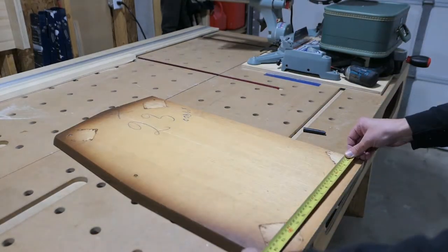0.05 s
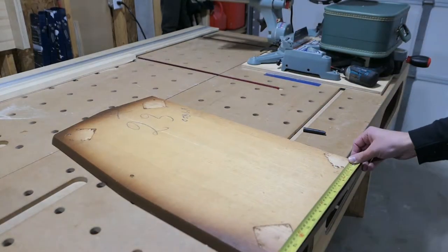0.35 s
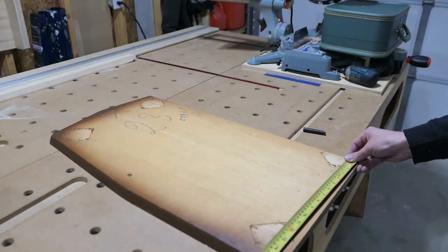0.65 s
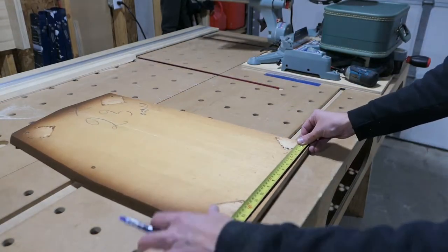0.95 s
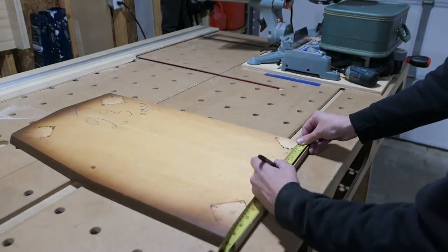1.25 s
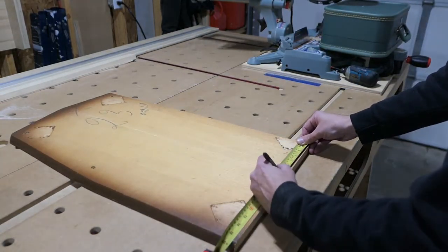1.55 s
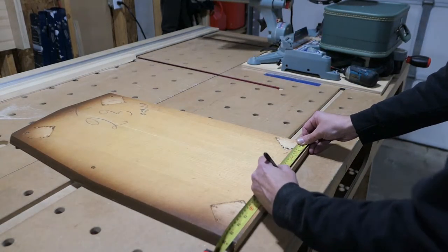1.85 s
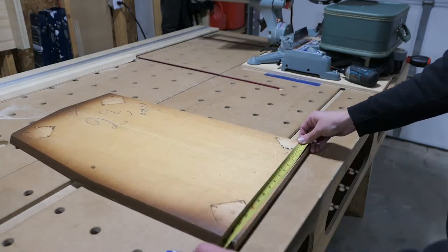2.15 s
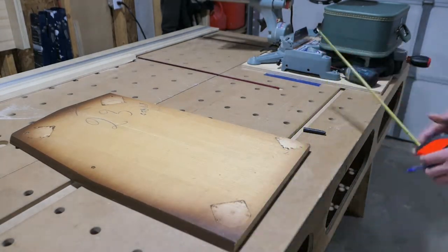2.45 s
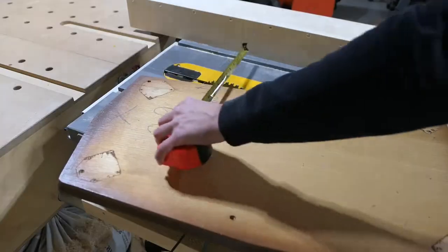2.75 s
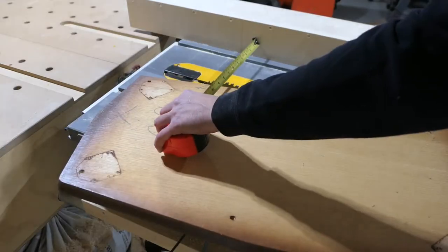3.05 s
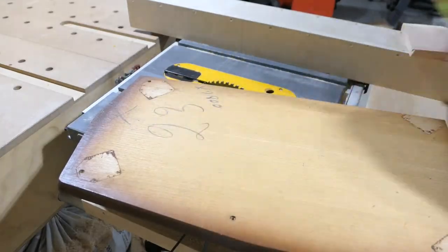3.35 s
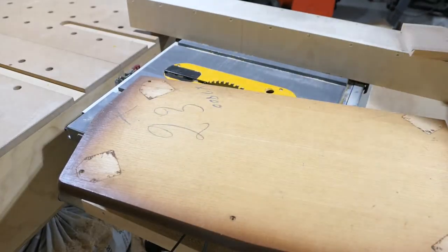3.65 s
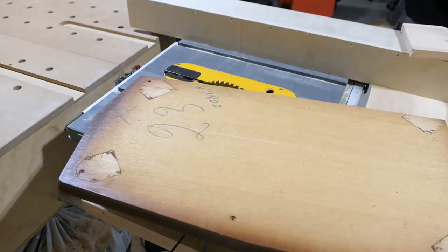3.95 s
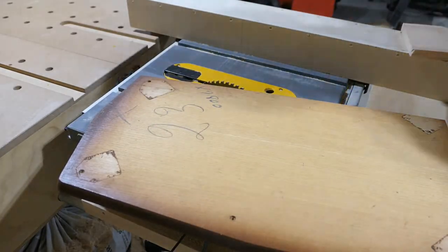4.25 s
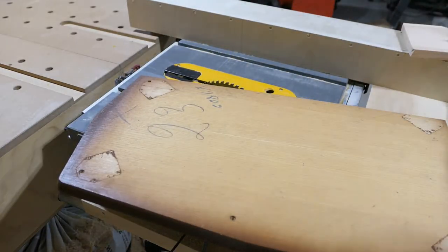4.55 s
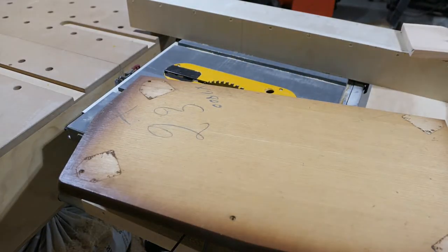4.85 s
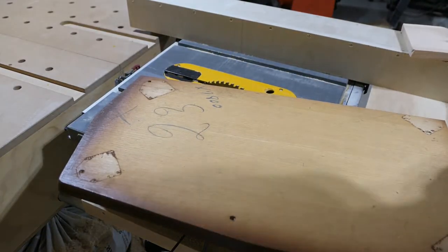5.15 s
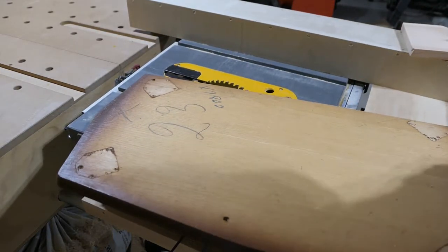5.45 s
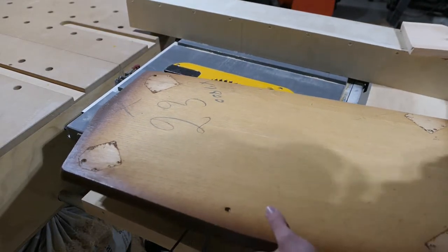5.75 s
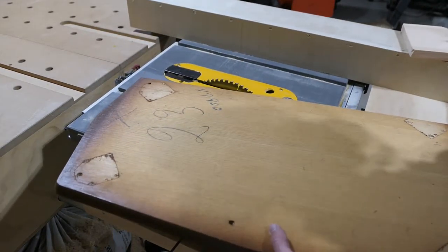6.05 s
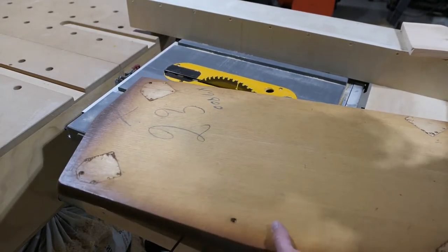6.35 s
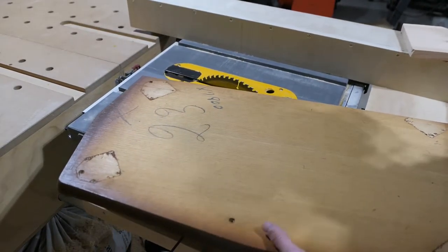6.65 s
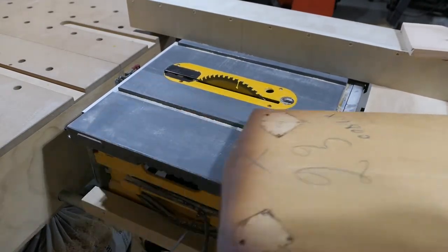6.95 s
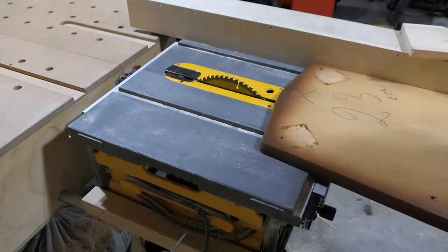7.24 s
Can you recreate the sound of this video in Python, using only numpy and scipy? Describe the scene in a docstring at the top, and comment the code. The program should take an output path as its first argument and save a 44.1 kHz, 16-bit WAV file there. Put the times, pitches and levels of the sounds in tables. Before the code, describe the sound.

A wooden board knocks on a workbench, a steel tape measure rattles shut, then the board scrapes and clatters over a metal saw table.

```python
"""Woody knocks and a short scrape, then the clicks and rattle of a steel tape running back into its case.
A wooden tabletop is handled on a workbench, then laid on a table saw, where it knocks, scrapes over the
metal in small slips and clatters against the edge. Each blow rings the board's modes; each scrape is a
stream of tiny catches with crackling dust. The workshop is small and dry, with a faint hush behind it."""
import sys
import numpy as np
from scipy import signal
from scipy.fft import rfft, irfft
from scipy.io import wavfile
from scipy.ndimage import uniform_filter1d

SR = 44100
rng = np.random.default_rng(int(sys.argv[2]) if len(sys.argv) > 2 else 0)


def to_wav(sig):
    """Store sig (one row per channel, or 1-D mono) as 16-bit WAV at the path in sys.argv[1].

    Samples outside -1..1 are clipped; the rate is SR.
    """
    pcm = np.clip(np.atleast_2d(sig), -1, 1) * 32767
    pcm = np.round(pcm).astype(np.int16)
    wavfile.write(sys.argv[1], SR, pcm.T)  # frames by channels


N = 326064
HZ = np.fft.rfftfreq(4096, 1 / SR)  # frequency grid of every EQ curve
T = np.arange(int(.4 * SR)) / SR  # time axis of one hit, in seconds

# Hits of board and hands on the bench, then of the board on the saw. Each row: start in seconds,
# contact time in seconds, favoured pitch in Hz, strength in dB, treble tilt in dB per octave.
BENCH_KNOCKS = [(.001, 0.00052, 980, -13.5, -7.5), (.144, 0.00089, 1490, -6, -4),
                (.219, 0.021, 810, -17.5, -2), (.457, 0.015, 790, -29, -1),
                (1.037, 0.00035, 1400, 7.5, -4.5), (1.07, 0.0051, 1210, 4.5, -5.5),
                (1.088, 0.0097, 1230, -2.5, -4.5), (1.355, 0.0033, 930, -26.5, -4.5),
                (1.757, .0025, 1120, -35, -12), (1.822, 0.0032, 1090, -32.5, -8),
                (1.888, 0.001, 1070, -33.5, -8), (1.936, 0.0019, 333, -24.5, -18),
                (2.141, 0.011, 650, -14.5, -5.5)]
SAW_KNOCKS = [(3.951, .013, 1180, 7.5, -7), (3.986, 0.018, 2750, 7, -7), (4.015, 0.004, 1600, 5.5, -4),
              (4.24, 0.0036, 1140, -20, -4), (4.822, 0.00043, 930, -16, -9.5),
              (4.924, 0.0045, 1010, -18.5, -10.5), (5.002, 0.0024, 2180, -3.5, -4.5),
              (5.131, 0.0021, 755, -19, -7.5), (5.264, 0.0025, 820, -13.5, -4),
              (5.301, 0.0009, 624, -7, -9), (5.376, 0.0022, 890, -13, -4), (5.421, 0.00032, 950, -14, -4),
              (5.787, 0.0052, 590, 0.5, -5.5), (5.808, 0.0023, 970, 0, -18), (5.84, 0.0034, 370, -14, -16),
              (5.878, 0.0014, 790, -8, -4), (6.108, 0.0027, 394, -10.5, -7), (6.206, 0.012, 950, -8, -4.5),
              (6.272, 0.0072, 573, -1, -7.5), (6.379, 0.00082, 900, -5, -5.5),
              (6.402, 0.0077, 390, -1.5, -6.5), (6.603, 0.0024, 900, -8, -6), (6.667, 0.01, 417, -4, -10),
              (6.942, 0.00044, 2460, -2.5, -4), (7.126, 0.00015, 1080, 5.5, -1.5),
              (7.147, 0.006, 525, 4, 0), (7.171, 0.0011, 820, 6.5, -13), (7.207, .0016, 935, 6.5, -5.5),
              (7.237, .0005, 634, 0.5, -7), (7.274, 0.00073, 720, -1.5, -6.5)]
# Sharp clicks of tape, case and pen, and ticks of the board catching on the saw. Each row: as above.
CLICKS = [(1.755, .0005, 14000, -44, -1.5), (1.822, .0005, 14000, -45, 0), (1.888, 0.00042, 14000, -46, -1),
          (1.989, 0.0022, 14000, -43, -1.5), (2.083, .00015, 13975, -34, -3.5),
          (2.137, 0.005, 1360, -8.5, -1.5), (2.49, 0.0098, 10200, -20.5, 0.76),
          (2.513, 0.0084, 1220, -16.5, -2.2), (2.722, 0.00086, 13000, -18.5, -0.2),
          (2.835, 0.0035, 1500, 5, -9), (2.876, 0.0045, 2090, 1, -3), (3.217, 0.00025, 7200, -6.5, -0.24),
          (3.345, 0.0036, 4350, -31, 0.8), (3.421, 0.0039, 900, -29, 1.5), (3.66, 0.0067, 1980, -1, -1),
          (4.949, 0.015, 5370, -7, -3), (4.99, 0.0062, 690, -7.5, -3.5), (5.046, 0.0019, 510, -4.5, -5.5),
          (5.566, 0.0023, 850, -10, -4), (5.609, 0.0021, 573, -9, -5.5), (6.012, .002, 880, -17, -2.5),
          (6.314, .001, 2930, -10.5, -4), (6.538, 0.0093, 2170, -1, -6), (6.552, 0.0013, 2300, -11.5, -4.5),
          (6.751, 0.0045, 2620, -20.5, 0)]
# Rubs of tape blade and hands. Each row: start, swell and fade in seconds, favoured pitch in Hz,
# strength in dB, treble tilt in dB per octave.
RUBS = [(.004, 0.0067, .03, 1100, -18.5, -3.5), (.055, 0.0053, 0.026, 2050, -14, -4.5),
        (.101, 0.0085, .018, 1740, -4, -3.5), (0.321, .0034, 0.036, 2370, -24.5, -2.5),
        (1.225, .01, 0.074, 14000, -29.5, -3), (2.184, 0.018, 0.0046, 13000, -23, 1),
        (2.441, .038, .01, 12000, -36.5, 1.4), (2.529, 0.0081, 0.081, 8000, -35, 3),
        (2.705, 0.01, 0.0025, 13000, -24.5, 1.3), (2.755, .006, 0.15, 1000, -23, 0.5),
        (2.848, 0.0067, 0.01, 9400, -22.5, 1.2), (3.234, 0.017, 0.031, 10400, -20.5, 0.3),
        (3.519, 0.02, 0.018, 4420, -9, -0.46), (3.579, 0.017, 0.092, 10000, -18, 1.1),
        (3.722, 0.018, 0.0064, 5040, -15, 1.5), (4.275, 0.0073, 0.024, 1100, -26, -1),
        (4.401, 0.0067, 0.041, 6300, -11, -1.5)]
# A corner catching. Each row: start in seconds, pitch in Hz, level in dB, T60 in seconds.
SQUEAKS = [(4.014, 2870, -38, 0.15), (6.3118, 2930, -23.5, 0.0086), (7.2057, 2220, -15, 0.017)]
# Low thuds under a few knocks. Each row: start in seconds, level in dB.
THUMPS = [(1.037, -30.5), (4.017, -31), (5.845, -29.5), (7.127, -33)]
# The board's ring on each surface. Each row: pitch in Hz, relative level in dB, T60 in seconds.
BENCH_MODES = [(358, -7.5, 0.68), (685, -5, 0.13), (793, 9, 0.14), (994, 4.5, 0.12), (1160, 4, 0.067),
               (1250, -16, 0.14), (1550, 6.5, 0.062), (1780, -22, .18), (2740, -3, 0.093)]
SAW_MODES = [(368, -10.5, 0.2), (530, -7, 0.13), (686.3, -6.5, 0.18), (825.6, 2, 0.11), (908, -3.5, 0.15),
             (1160, -6, 0.073), (1495, -2, 0.057), (1993, 7, 0.043), (3070, -11, .1), (3790, -9, 0.12),
             (5603, -6, 0.047)]
# Fader moves for the board turning on the bench and dragging over the saw.
# Each row: time in seconds, friction in dB, grit in dB.
BENCH_SLIDE = [(0.64, -83, -89), (0.706, -50.5, -56.5), (0.8, -41.5, -44), (0.832, -43, -48.5),
               (0.88, -71, -65), (0.94, -91, -108)]
SAW_SLIDE = [(5.738, -74, -74), (5.786, -33, -40), (5.81, -28.5, -51), (5.828, -46.5, -59.5),
             (5.94, -49.5, -59), (5.966, -45, -51.5), (6.15, -47.5, -66), (6.288, -40, -53),
             (6.512, -40.5, -58.5), (6.558, -37.5, -53), (6.65, -50, -69), (6.684, -52, -47),
             (6.716, -51, -69), (6.808, -50.5, -49.5), (6.86, -32.5, -34), (6.952, -46, -44.5),
             (7.014, -60, -78), (7.11, -52, -56)]
# Short skids on the saw. Each row: start in seconds, hold in seconds, friction in dB, grit in dB.
SHOVES = [(5.247, 0.046, -53.5, -65), (5.365, 0.12, -57.5, -61.5), (5.531, 0.01, -47.5, -49),
          (5.569, 0.087, -53.5, -63), (6.205, 0.022, -46, -56), (6.382, .04, -46, -55),
          (7.128, 0.12, -41.5, -46.5)]
# Centres of the five-band EQ that voices hits and rubs, in Hz.
BAND_HZ = (450, 1100, 2700, 6200, 12000)
# Tone of each family of sounds. Each row: frequency in Hz, relative level in dB.
BENCH_TONE = [(450, -3.5), (1100, 0.5), (2700, -1.5), (6200, -1), (12000, -2)]
SAW_TONE = [(450, -0.5), (1100, 0.5), (2700, -0.4), (6200, -0.5), (12000, -5.7)]
CLICK_TONE = [(450, -12.5), (1100, -0.5), (2700, -5.5), (6200, 0), (12000, -0.5)]
RUB_TONE = [(450, -5.5), (1100, 2.5), (2700, 0.7), (6200, 1), (12000, -1.7)]
BENCH_SCRAPE_TONE = [(120, -68), (200, -50), (315, 4.5), (399, -16), (488, -7), (742, 8), (812, 3),
                     (1170, -1), (3420, -15.5), (8050, -21.5), (15500, -34.5)]
SAW_SCRAPE_TONE = [(120, -65), (200, -33), (321, -11.5), (378, -7), (479, -1.5), (742, -4), (827, 2),
                   (1050, -3.5), (1230, -4), (1560, -6), (2600, -9), (2900, -12.5), (6470, -19),
                   (15500, -34)]
AIR_TONE = [(15, -87), (25, -27), (141, -14), (451, -1), (1230, -4), (1370, -2), (2160, -6), (3080, -12),
            (3340, -9.5), (7920, -19), (14000, -15.5), (16000, -27)]
# Knocks, clicks and rubs have little bass. Each row: frequency in Hz, gain in dB.
BASS_ROLLOFF = [(20, -27.5), (100, -34), (150, -23), (210, -15.5), (270, -7.5), (350, 1.5), (480, 1.5),
                (16000, 0)]
# The workshop's decay. Each row: frequency in Hz, T60 in seconds.
ROOM_T60 = [(100, 0.68), (350, 0.36), (1000, 0.16), (3000, 0.22), (7000, 0.21), (15000, 0.16)]
# Stereo width of the echoes and of the hush. Each row: frequency in Hz, side against mid in dB.
ECHO_WIDTH = [(100, -2), (400, -14.5), (2200, -4), (10000, -5.5)]
AIR_WIDTH = [(60, -10), (240, 8.5), (950, 9.5), (3770, 4), (15000, -4.5)]
# Stereo balance. Each row: frequency in Hz, left against right in dB.
PAN = [(250, 2.5), (550, -0.4), (1100, -0.7), (2100, -2.5), (4200, -1.1), (12000, -0.5)]


def knocks(rows, tone, modes, ring_db, body_db, body_t60, body_hz, lift_db, gain_db):
    """A blow sets off the board's dense, damped body and its clear modes."""
    out = np.zeros(N)
    for start, contact, hz, db, tilt_db in rows:
        dense = rng.standard_normal(len(T)) * amp(-60 * T / body_t60)
        dense = unit(signal.sosfilt(signal.butter(2, body_hz, fs=SR, output="sos"), dense))
        clear = amp(ring_db + 0.12 * min(db, 0)) * ring(modes)  # light touches ring less
        attack = 1 - np.exp(-2 * T / max(contact, 1 / SR))
        knock = contact_force(contact, crack=0.81) + (amp(body_db) * dense + clear) * attack
        add(out, start, voice(favour(knock, hz, lift_db), hz, db, tilt_db, tone))
    return amp(gain_db) * out


def ring(modes):
    """The board's clear modes; each blow excites them a little differently."""
    partials = np.zeros(len(T))
    for hz, db, t60 in modes:
        decay = amp(db + rng.normal(0, 1.3) - 60 * T / t60)
        partials += decay * np.sin(2 * np.pi * (hz * T + rng.random()))
    return unit(partials)


def contact_force(contact, crack, soft_s=0.0022):
    """A brief contact is one crack; a longer one starts softly and chatters."""
    attack = 1 - np.exp(-2 * (T + 1 / SR) / contact)
    force = unit(grains(len(T), per_s=22000, spread_db=1.5) * attack * np.exp(-T / contact))
    force[0] += crack * np.exp(-contact / soft_s)
    return force


def favour(x, hz, lift_db, octaves=0.12):
    """A narrow peak: where a blow lands decides which resonances speak most."""
    return colour(x, lift_db / (1 + (np.log2((HZ + 1) / hz) / octaves) ** 2))


def voice(x, favoured_hz, level_db, tilt_db, tone, pivot_hz=1100, hump_db=9, hump_octaves=0.87):
    """EQs a contact to its family's tone, tilted by hardness, with a broad hump at its favoured pitch."""
    centres = np.array(BAND_HZ)
    power, hz = abs(rfft(x)) ** 2, np.fft.rfftfreq(len(x), 1 / SR)
    own_db = [10 * np.log10(power[abs(np.log((hz + 1) / f)) < np.log(1.5)].mean()) for f in centres]
    strength_db = level_db * np.where(centres < pivot_hz, 0.66, 1)  # harder blows sound brighter
    hardness_db = tilt_db * np.maximum(np.log2(centres / pivot_hz), 0)
    place_db = hump_db * np.exp(-(np.log2(centres / favoured_hz) / hump_octaves) ** 2)
    gains_db = curve(tone, centres) + strength_db + hardness_db + place_db - own_db
    return colour(x, curve(np.c_[centres, gains_db]) + curve(BASS_ROLLOFF))


def scrape(levels, tone, modes, slips_per_s, spread_db, ring_db, catch_db, crackle_db,
           friction_db, judder_db, grit_db):
    """Three spots under the board catch and slip, each with its own woody colour; dust crackles."""
    friction, grit = levels
    judder = friction + np.minimum(0.97 * (friction - grit), 9)  # dies as grit takes over
    drive = np.zeros(N)
    for _ in range(3):
        slips = grains(N, slips_per_s, spread_db) * wobble(per_s=45, depth_db=catch_db)
        spot = unit(rng.standard_normal(len(T)) * np.exp(-T / 0.0027))
        drive += signal.oaconvolve(slips, spot + amp(ring_db) * ring(modes))[:N]
    wood = colour(drive, curve(tone))
    specks = grains(N, per_s=920, spread_db=0.97)
    dust = colour(unit(drive) + amp(crackle_db) * specks, curve(tone))
    return (amp(friction + friction_db) * band(wood, 502, 4100)
            + amp(judder + judder_db) * band(wood * wobble(per_s=24, depth_db=1.1), 348, 594)
            + amp(grit + grit_db) * band(dust, 2780, 19600))


def slide(rows):
    """Friction and grit envelopes of a long slide in dB, silent outside its span."""
    times, *levels = np.transpose(rows)
    return np.array([np.interp(np.arange(N) / SR, times, db, left=-120, right=-120) for db in levels])


def shove(start, hold, friction_db, grit_db, rise_db_per_s=1202, fall_db_per_s=212):
    """Friction and grit envelopes of a shove in dB: it breaks loose quickly, holds and runs out."""
    t = np.arange(N) / SR - start
    shape_db = rise_db_per_s * np.minimum(t, 0) - fall_db_per_s * np.maximum(t - hold, 0)
    return np.array([friction_db + shape_db, grit_db + shape_db])


def clicks(gain_db=-2, tail_db=-7, tail_t60=0.011):
    """Sharp clicks of tape, case and pen, and ticks of the board catching on the saw; all die fast."""
    out = np.zeros(N)
    for start, contact, hz, db, tilt_db in CLICKS:
        tail = unit(rng.standard_normal(len(T)) * amp(-60 * T / tail_t60))
        click = contact_force(contact, crack=0.13) + amp(tail_db) * tail
        add(out, start, voice(favour(click, hz, lift_db=6.5), hz, db, tilt_db, CLICK_TONE))
    return amp(gain_db) * out


def rubs(gain_db=-2, rattle_db=-5):
    """Tape blade and hands rub: fine friction grains and loose ticks swell and stop."""
    out = np.zeros(N)
    for start, swell, fade, hz, db, tilt_db in RUBS:
        release = np.exp(-(np.maximum(T - swell, 0) / fade) ** np.sqrt(2) / 2)
        stroke = np.minimum(T / swell, 1) * release
        friction = grains(len(T), per_s=12000, spread_db=4.2)
        rattle = amp(rattle_db) * grains(len(T), per_s=110, spread_db=0.33)
        add(out, start, voice((friction + rattle) * stroke, hz, db, tilt_db, RUB_TONE))
    return amp(gain_db) * out


def squeaks(attack_s=0.0016):
    """A sticking corner gives a short, pure tone."""
    out = np.zeros(N)
    for start, hz, db, t60 in SQUEAKS:
        envelope = amp(db - 60 * T / t60) * np.minimum(T / attack_s, 1)
        add(out, start, envelope * np.sin(2 * np.pi * hz * T))
    return out


def thumps(hz=220, t60=0.06):
    """A short, low thud under a few knocks: one quickly damped mode of the stand."""
    out = np.zeros(N)
    mode = unit(np.sin(2 * np.pi * hz * T) * amp(-60 * T / t60) * (1 - np.exp(-T * hz)))
    for start, db in THUMPS:
        add(out, start, amp(db) * mode)
    return out


def workshop(x, cycle_hz=0.6445):
    """Three echo patterns crossfade as board and hands move; the direct sound is the same in both ears."""
    turn = 2 * np.pi * cycle_hz * np.arange(N) / SR
    fades = [np.cos(turn + k * np.pi / 3) * np.sqrt(2 / 3) for k in range(3)]
    mid, side = sum(signal.oaconvolve((x * fade)[None], reflections(), axes=1)[:, :N] for fade in fades)
    return np.array([x + mid + side, x + mid - side])


def reflections(tail_db=-4.5, early_db=-9, build_s=0.0023):
    """Mid and side echoes of one spot: near surfaces first, then a short tail."""
    hz, t, noise = signal.stft(rng.standard_normal((2, len(T))), SR, nperseg=256)
    decay = amp(-60 * t / curve(ROOM_T60, hz)[:, None])
    tail = signal.istft(noise * decay, SR, nperseg=256)[1][:, :len(T)]
    tail = unit(tail * (1 - np.exp(-(T / build_s) ** 2)))
    early = unit(rng.standard_normal((2, len(T))) * (T > .001) * np.exp(-T / 0.0011))
    mid, side = amp(tail_db) * tail + amp(early_db) * early
    return np.array([mid, colour(side, curve(ECHO_WIDTH))])


def air(mid_db=-70):
    """A wide, steady bed of room and microphone hush."""
    mid, side = (unit(colour(rng.standard_normal(N), curve(AIR_TONE))) * np.sqrt(N) for _ in range(2))
    side = colour(side, curve(AIR_WIDTH))
    return amp(mid_db) * np.array([mid + side, mid - side])


def suppress(x, depth_db=4.5, margin_db=6, knee_db=7, forget_db_per_s=175):
    """A noise suppressor ducks each band once it falls well below its recent peak."""
    _, t, spectra = signal.stft(x, SR, nperseg=512)
    power = uniform_filter1d((abs(spectra) ** 2).mean(0), size=17, axis=0)
    power = uniform_filter1d(power, size=3, axis=1)
    now_db = 10 * np.log10(abs(power) + 1e-20)
    recent_db = np.maximum.accumulate(now_db + forget_db_per_s * t, axis=1) - forget_db_per_s * t
    cut_db = depth_db * np.clip((recent_db - now_db - margin_db) / knee_db, 0, 1)
    return signal.istft(spectra * amp(-cut_db), SR, nperseg=512)[1][:, :N]


def grains(samples, per_s, spread_db):
    """Tiny slips of random sign, a few of them large."""
    sizes = amp(spread_db * np.minimum(rng.exponential(1, samples), 3.5))
    return unit(rng.standard_normal(samples) * sizes * (rng.random(samples) < per_s / SR))


def wobble(per_s, depth_db):
    """A gain that wavers at random around 1."""
    points = rng.standard_normal(N // 100)
    drift = np.interp(np.arange(N) / SR * per_s, np.arange(len(points)), points)
    return amp(depth_db * np.clip(drift, -1.5, 1.5))


def colour(x, gain_db):
    """Minimum-phase EQ with its gains on the HZ grid."""
    log_gain = np.log(amp(np.maximum(gain_db, -100)))
    mirrored = np.concatenate([log_gain, log_gain[-2:0:-1]])
    taps = irfft(np.exp(np.conj(signal.hilbert(mirrored)))[:len(HZ)])
    return signal.oaconvolve(x, taps)[:len(x)]


def band(x, lo_hz, hi_hz):
    """One band of x, at rms 1."""
    sos = signal.butter(2, [lo_hz, hi_hz], "band", fs=SR, output="sos")
    return unit(signal.sosfilt(sos, x)) * np.sqrt(len(x))


def curve(points, hz=HZ):
    """Joins breakpoints on a log-frequency axis."""
    point_hz, values = np.transpose(points)
    return np.interp(np.log(hz + 1), np.log(point_hz + 1), values)


def amp(db):
    """Decibels to gain."""
    return 10 ** (np.asarray(db) / 20)


def unit(x):
    """Scales to energy 1."""
    return x / np.sqrt(np.sum(x ** 2, axis=-1, keepdims=True) + 1e-20)


def add(mix, start, sound):
    """Mixes a sound in at a start time in seconds."""
    part = mix[round(start * SR):][:len(sound)]
    part += sound[:len(part)]


def scene():
    """Board and tape in the workshop; the highs lean a little right, the lows left."""
    saw_levels = np.max([slide(SAW_SLIDE)] + [shove(*row) for row in SHOVES], axis=0)
    board = knocks(BENCH_KNOCKS, BENCH_TONE, BENCH_MODES, ring_db=-4, body_db=-2,
                   body_t60=0.13, body_hz=2020, lift_db=4.5, gain_db=-1)
    board += knocks(SAW_KNOCKS, SAW_TONE, SAW_MODES, ring_db=-1.5, body_db=4.5,
                    body_t60=0.061, body_hz=2800, lift_db=9, gain_db=-2)
    board += scrape(slide(BENCH_SLIDE), BENCH_SCRAPE_TONE, BENCH_MODES, slips_per_s=4000, spread_db=6.5,
                    ring_db=-19.5, catch_db=-1.5, crackle_db=-10,
                    friction_db=-0.5, judder_db=-6, grit_db=1.5)
    board += scrape(saw_levels, SAW_SCRAPE_TONE, SAW_MODES, slips_per_s=1300, spread_db=4.5,
                    ring_db=-17.5, catch_db=5.5, crackle_db=-1.5,
                    friction_db=0, judder_db=-17, grit_db=1)
    left, right = workshop(board + clicks() + rubs() + squeaks() + thumps())
    pan_db = curve(PAN) / 2
    return np.array([colour(left, pan_db), colour(right, -pan_db)]) + air()


def record(dry):
    """Noise suppression tightens the tails; a steep low-pass trims the very top."""
    lowpass = signal.firwin(511, 16200, window=("kaiser", 9), fs=SR)
    return signal.oaconvolve(suppress(dry), lowpass[None], "same")


dry = scene()
out = record(dry)
to_wav(out)
```